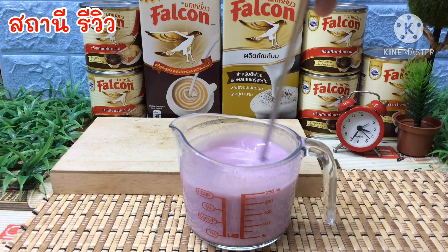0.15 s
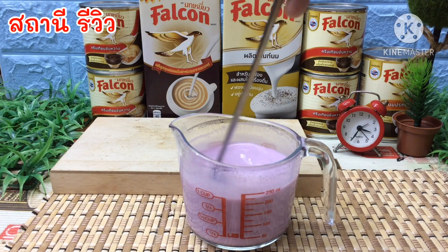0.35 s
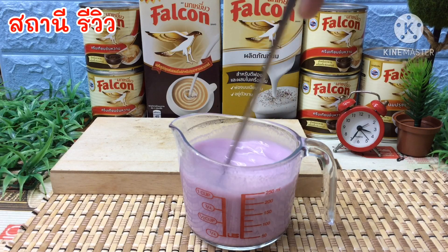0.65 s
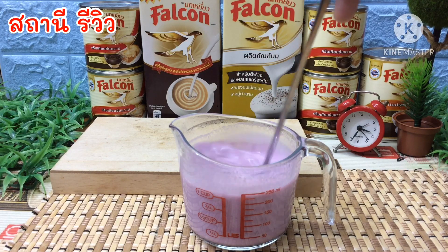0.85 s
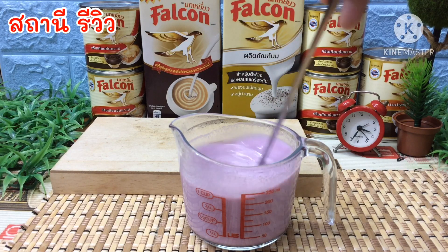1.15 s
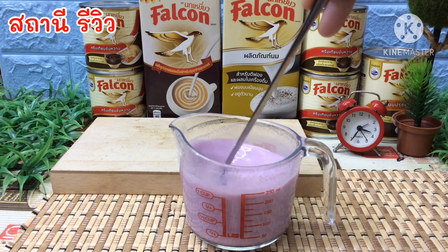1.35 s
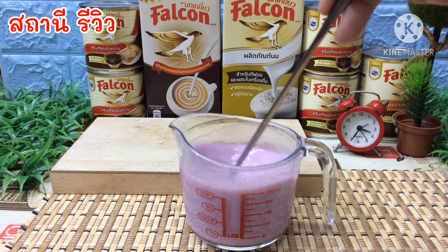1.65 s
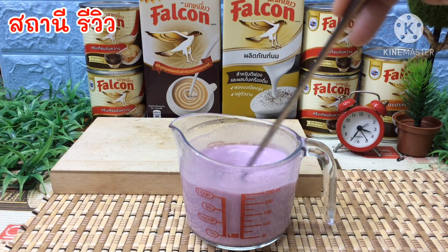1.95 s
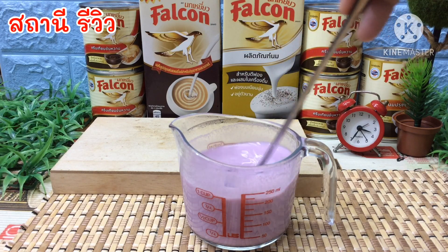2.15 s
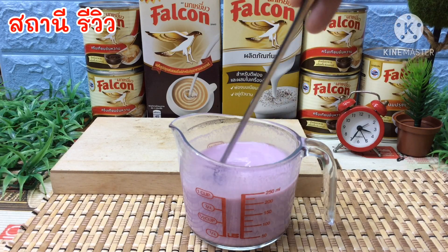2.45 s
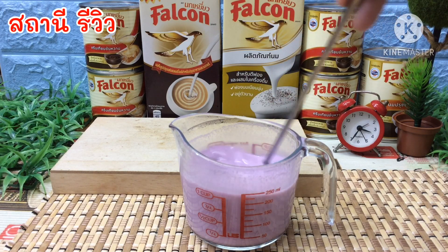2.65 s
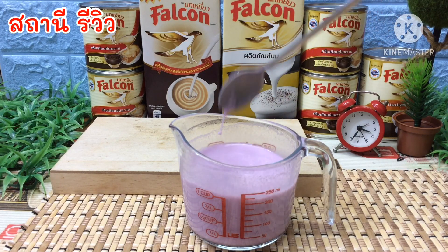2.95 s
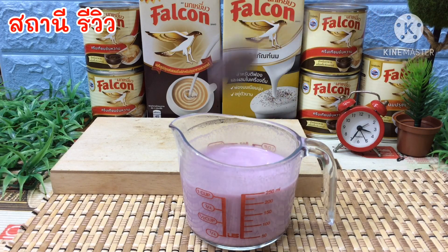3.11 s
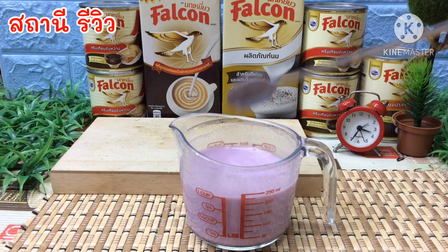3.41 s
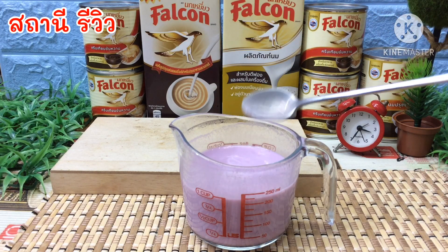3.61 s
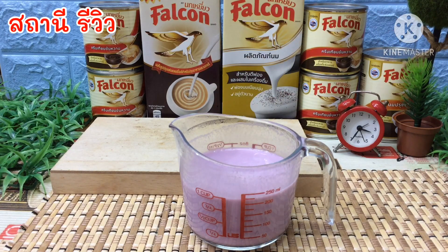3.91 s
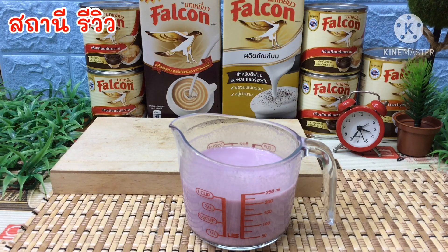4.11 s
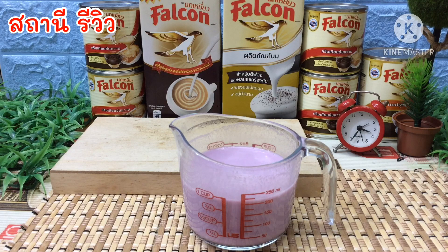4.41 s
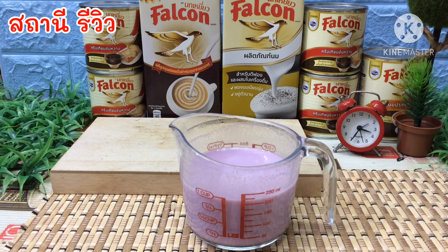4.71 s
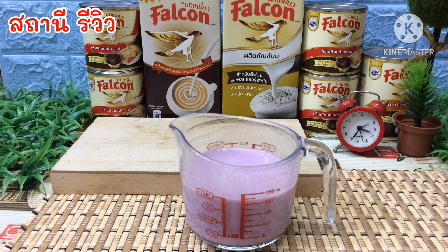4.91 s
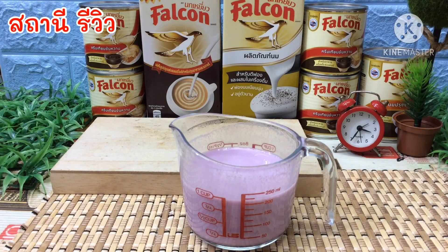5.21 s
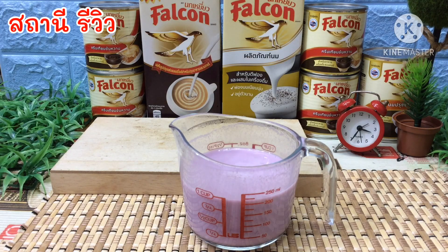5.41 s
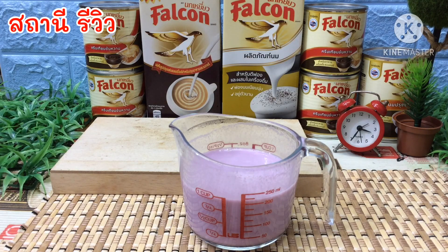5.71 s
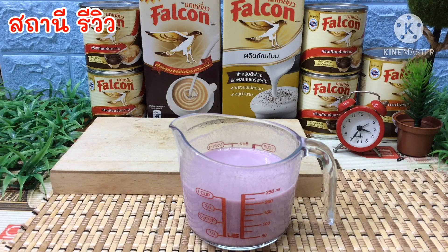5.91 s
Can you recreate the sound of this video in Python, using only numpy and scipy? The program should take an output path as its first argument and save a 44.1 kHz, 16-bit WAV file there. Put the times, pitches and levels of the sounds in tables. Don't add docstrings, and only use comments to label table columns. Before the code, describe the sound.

In a small room, a metal spoon stirs a thick drink in a glass jug, with quick dull-bright clinks and light scraping along the bottom. The stirring softens, then ends with a few more clinks and a small splash. After a quiet gap over low rumble, something lands very loudly on a wooden table, followed by a lighter knock. Close microphone, short reverberation.

```python
import sys
import numpy as np
from scipy import signal
from scipy.fft import rfft, irfft
from scipy.io import wavfile
from scipy.ndimage import uniform_filter1d

SR = 44100
rng = np.random.default_rng(int(sys.argv[2]) if len(sys.argv) > 2 else 0)


def to_linear_factor(level_db):
    exponent = np.asarray(level_db, float) / 20
    return 10 ** exponent


def master_out(mix):
    frames = np.transpose(np.atleast_2d(mix))
    ceiling = np.clip(frames, -1, 1)
    pcm = np.round(ceiling * 32767).astype(np.int16)
    wavfile.write(sys.argv[1], SR, pcm)


N = 267150

# pitch_hz, density_db (per Hz)
HISS_SPECTRUM = [(20, -33.5), (50, -24), (70, -19), (120, -23.5), (170, -30.5), (313, -35.5), (600, -38.5),
                 (1380, -45.5), (4000, -52.5), (15300, -55.5), (16300, -65), (16800, -71)]
HISS_DB, RUMBLE_DB, RUMBLE_SWAY_DB = -54, -41, 2
# pitch_hz, width_hz, level_db
MACHINE_HUM = [(48.5, 4.54, -42.5), (136.4, 8.6, -63)]
# nearest_s, half_length_s, level_db
TRAFFIC = [
    (0.08, .2, -45.5),
    (0.55, 0.25, -51.5),
    (1.7, 1.6, -53),
    (3.35, 0.98, -49),
    (4.2, 0.74, -62),
    (5.05, 0.55, -49),
]
# time_s, upper_mode_hz, lower_mode_hz
SPOON_PATH = [(0.0, 1680, 1260), (0.085, 1466, 925), (0.33, 1310, 1060), (0.39, 1445, 1150),
              (0.7, 1410, 1055), (0.89, 1515, 1040), (0.98, 1700, 1180), (1.04, 1360, 1130),
              (1.18, 1410, 1124), (1.28, 1630, 1126), (1.42, 1410, 1040), (1.55, 1680, 1113),
              (1.78, 1490, 1180), (1.86, 1650, 1110), (1.95, 1660, 1224), (2.1, 1350, 1000),
              (2.22, 1513, 1134), (2.7, 1458, 1016)]
# middle_s, half_length_s, upper_mode_db, lower_mode_db and grit_db (against upper)
STROKES = [(0.0, .04, -40, 2, -11), (0.085, 0.067, -49.5, -8, -11), (0.335, 0.07, -50, 4, -7),
           (0.393, 0.03, -41.5, -24, -17), (0.57, 0.12, -44, 1, -7), (0.655, 0.08, -57.5, 9.5, -8),
           (0.73, 0.079, -54.5, -9, -23), (0.895, 0.065, -41.5, -9, -7), (0.955, 0.047, -47, -14, -21),
           (0.99, 0.038, -48.5, -4, -23), (1.075, 0.028, -54, -3, -12), (1.19, 0.11, -49.5, 4, -9),
           (1.28, .08, -57, 6, -15), (1.4, 0.093, -57.5, -15, -13), (1.54, 0.091, -51.5, -3, -13),
           (1.69, 0.12, -56.5, -7, -16), (1.86, 0.065, -59.5, 5, -7), (1.96, 0.13, -58, -5, -12),
           (2.192, 0.066, -53, -1.5, -28), (2.29, 0.21, -63, 3, -12), (2.649, 0.094, -48, -2.5, -2.5),
           (2.71, 0.083, -43.5, -6, -4.5)]
# start_s, level_db, favoured_wall_hz, upper_glass_db and steel_db (against the blow)
BLOWS = [(0.1253, -24.5, 1310, 7.5, -4), (0.2548, -11.5, 1328, 0, -11.5), (0.4226, -14.5, 1248, 3, -6),
         (0.515, -26, 1274, 0, -16), (0.5931, -25, 1408, 8, -3), (0.784, -18.5, 1290, 9.5, 0.6),
         (0.823, -19, 1260, -3, -30), (0.8426, -25.5, 1345, 4.5, -26), (1.109, -18, 1313, 5, -2),
         (2.442, -16.5, 1314, -3, -27), (2.4844, -22, 1283, -1, -42), (2.5703, -34.5, 1410, -7, -28),
         (2.7212, -32.5, 1360, 8, -4)]
# start_s, level_db, favoured_wall_hz
TOUCHES = [(0.285, -28, 1170), (0.452, -46, 1200), (0.483, -28, 1237), (0.6035, -28.5, 1424),
           (0.856, -24.5, 1210), (1.007, -32.5, 1110), (1.070, -38.5, 1376), (1.286, -40.5, 1110),
           (1.3343, -41, 1056), (1.427, -43, 1426), (1.546, -61, 1110), (1.588, -42.5, 1315),
           (1.8046, -46.5, 1305), (2.2562, -43.5, 1410), (2.3351, -35, 1220)]
TOUCH_UPPER_DB, TOUCH_STEEL_DB, SPOON_UNDER_TICK_DB = -12.5, -25, -3
# pitch_hz, level_db, t60_s
WALL_MODES = [(1019, 7, 0.24), (1110, 5, 0.29), (1246, 15, 0.067), (1253, 6.5, 0.041), (1348, 6, 0.2),
              (1410, 13, 0.085), (1550, 9.5, 0.18), (1680, 8.5, 0.14), (1710, 19, 0.04)]
# pitch_hz, level_db, t60_s
UPPER_MODES = [(2120, -9, 0.045), (2170, 1, 0.053), (2166, 11, 0.099), (2970, -10, 0.044), (2940, 0, 0.037),
               (2860, -7, 0.029), (3047, 6, 0.041), (3680, -9.5, 0.033), (4247, -27, 0.018),
               (4340, -34, 0.02), (4930, 3, 0.03)]
# pitch_hz, level_db, t60_s
SPOON_MODES = [(4950, -27, 0.0254), (5890, -3, 0.017), (5700, -9, 0.026), (7070, -18, 0.043),
               (8400, -11, 0.035)]
# start_s, level_db, pitch_hz
BOARD_THUDS = [
    (0.123, -40, 123),
    (0.253, -31, 115.5),
    (0.422, -42.5, 101),
    (0.781, -62, 121),
    (0.822, -39.5, 128),
    (1.111, -37, 126),
    (2.442, -35.5, 120),
    (2.483, -40, 113),
]
# rim_db, rim_hz, middle_hz, spoon_line_db (against the rim)
BLOW_RINGS = [(-38, 2000, 1600, 0), (-29.5, 1540, 2760, -13), (-31.5, 1736, 2400, -15),
              (-55, 1700, 2250, -23), (-43.5, 1680, 2250, -10), (-29.5, 1725, 3000, 2),
              (-39.5, 880, 2280, -9), (-45, 990, 2200, -21), (-32.5, 1694, 2250, -1.5),
              (-31, 1500, 2300, -12), (-36, 1560, 3200, -5), (-53.5, 1300, 3500, -17),
              (-48, 1900, 3100, -24)]
MIDDLE_UNDER_RIM_DB, SPOON_LINE_HZ = -1, 6940
# start_s, level_db, pitch_hz, t60_s
TICKS = [(1.3718, -49.5, 6940, 0.023), (1.4366, -51, 2460, 0.024), (1.6544, -54, 2940, 0.022),
         (1.6921, -45.5, 3000, 0.017), (2.0245, -50, 4940, 0.02), (4.6084, -42.5, 2560, 0.012),
         (4.609, -48, 7900, 0.01), (1.8612, -50, 10000, 0.01), (2.987, -49.5, 9130, 0.0082),
         (5.4247, -51, 8900, 0.01), (5.4425, -44.5, 8100, 0.0091), (5.717, -44.5, 1740, 0.0052),
         (5.812, -36, 1680, 0.0065), (5.811, -43.5, 590, 0.027),]
# start_s, level_db, pitch_hz, t60_s
SPLASHES = [
    (0.516, -36, 4000, 0.14),
    (1.52, -55, 2400, 0.12),
    (2.4545, -40, 5300, 0.09),
    (2.66, -46, 3700, 0.16),
]
# start_s, level_db, landing_length_s
LANDINGS = [
    (4.713, 2, 0.01),
    (5.475, -10, 0.011),
]
# pitch_hz, level_db, t60_s
TABLE_MODES = [
    [(200, -2.5, 0.064), (354, -2, 0.062), (480, 3, .06), (590, -2.5, 0.03), (824, -6.5, 0.09),
     (1026, 5.5, 0.042), (1253, 0, 0.03), (1630, -5, 0.026), (1700, -2.5, 0.062), (2220, -5.5, 0.038),
     (2780, -6, .03), (3500, -7.5, 0.03)],
    [(330, -15, 0.046), (478, 6.5, 0.041), (1026, 0, 0.055), (1716, 2, 0.049), (1900, -20, 0.033),
     (2460, -9, 0.038), (2700, -3, 0.022), (3540, -20, 0.024), (7000, -35, .07), (7900, -25, .087)],
]
# pitch_hz, level_db
CRACK_SPECTRA = [
    [(60, -39.5), (135, -14), (280, -27.5), (490, -1.5), (850, -13), (1050, -0.5), (1600, -7.5),
     (3300, -9.5), (6000, -27), (16000, -49)],
    [(60, -46), (190, -12), (330, -0.5), (500, 2.5), (900, -9), (1030, -5.5), (2000, -9.5), (2850, -6.5),
     (4300, -23), (7000, -38), (16000, -60)],
]
# start_s, level_db, table_mode_hz
ROCKS = [(4.713, -24.5, 137), (4.713, -18, 1014), (5.475, -38, 199), (5.476, -29.5, 1017), (4.89, -45, 590),
         (5.04, -49.5, 324), (5.13, -51.5, 590), (5.14, -57.5, 1064), (5.2, -60, 970), (5.205, -57, 565),
         (5.23, -58, 340), (5.61, -55, 1036)]
# pitch_hz, t60_s
ROOM_DECAY = [(100, 0.28), (500, 0.2), (1500, 0.16), (4000, 0.17), (12000, 0.15)]


def evened(x):
    return x / np.sqrt(np.mean(x ** 2) + 1e-20)


def peaked(x):
    return x / np.max(abs(x))


def read(points, hz):
    f, value = np.transpose(points)
    return np.interp(np.log(hz + 1), np.log(f + 1), value)


def add(mix, s, sound):
    part = mix[round(s * SR):][:len(sound)]
    part += sound[:len(part)]


def band(x, lo_hz, hi_hz):
    edges = [lo_hz, min(hi_hz, SR / 2.1)]
    return signal.sosfilt(signal.butter(2, edges, "band", fs=SR, output="sos"), x)


def coloured(x, points):
    gain = to_linear_factor(read(points, np.fft.rfftfreq(len(x), 1 / SR)))
    return irfft(rfft(x) * gain, len(x))


def ring(modes, extra_db, t, longest=0.13):
    hz, db, t60 = np.transpose(modes)[:, :, None]
    t60 = np.clip(t60, 0.01, longest)
    decay = to_linear_factor(db + extra_db[:, None] - 60 * t / t60)
    return (decay * np.sin(2 * np.pi * hz * t)).sum(0)


def resonate(x, hz, width_hz):
    turn = np.exp(2j * np.pi * np.cumsum(hz * np.ones(len(x))) / SR)
    r = np.exp(-np.pi * width_hz / SR)
    smooth = signal.lfilter([1], np.convolve([1, -r], [1, -r]), x / turn)
    return evened((turn * smooth).real)


def swells(rows, t, extra_db=0):
    s, half, db = np.transpose(rows)[:3, :, None]
    return np.sqrt((to_linear_factor(db + extra_db - 20 * ((t - s) / half) ** 2) ** 2).sum(0))


def air():
    far = evened(band(band(rng.standard_normal(N), 150, 360), 150, 900))
    far = far * swells(TRAFFIC, np.arange(N) / SR) * to_linear_factor(-11.0)
    rumble = band(band(rng.standard_normal(N), 16, 38), 12, 45)
    rumble = rumble / np.sqrt(uniform_filter1d(rumble ** 2, size=4500))
    sway = evened(band(rng.standard_normal(N), 0.17, 0.91))
    rumble = to_linear_factor(RUMBLE_DB + RUMBLE_SWAY_DB * sway) * rumble
    hum = sum(to_linear_factor(db) * resonate(rng.standard_normal(N), hz, width) for hz, width, db in MACHINE_HUM)
    hiss = to_linear_factor(HISS_DB) * evened(coloured(rng.standard_normal(N), HISS_SPECTRUM))
    return hiss + far + rumble + hum


def slide():
    s, *columns = np.transpose(SPOON_PATH)
    t = np.arange(3 * SR) / SR
    high_hz, low_hz = (np.interp(t, s, c) for c in columns)
    low_db, grit_db = np.transpose(STROKES)[3:, :, None]
    happens = rng.random((3, len(t))) < 700 / SR
    slips = happens * to_linear_factor(2.5 * np.minimum(rng.exponential(1, (3, len(t))), 4))
    slips = slips * rng.choice([-1., 1.], slips.shape) + 0.16 * rng.standard_normal(slips.shape)
    high = 1.08 * resonate(slips[0], high_hz, 100)
    high += 0.5 * resonate(slips[0], high_hz * 0.705, 170) + 0.1 * resonate(slips[0], high_hz * 1.6, 160)
    low = resonate(slips[1], low_hz, 70) + 0.44 * resonate(slips[1], low_hz * 1.094, 240)
    rub = slips[2] + 0.5 * rng.standard_normal(len(t))
    grit = evened(band(rub, 1000, 3650)) + 1.5 * evened(band(rub, 930, 1850))
    grit += 0.87 * resonate(rub, 2230, 300) + 0.36 * resonate(rub, 3300, 400)
    strokes = swells(STROKES, t, -3.2) * high
    strokes += swells(STROKES, t, low_db - 3) * low
    strokes += swells(STROKES, t, grit_db) * evened(grit)
    out = np.zeros(N)
    add(out, 0, strokes)
    return out


def nearness(hz, slope_db):
    return -slope_db * abs(np.log2(np.array(WALL_MODES)[:, :1] / hz))


def clinks():
    out, t = np.zeros(N), np.arange(9000) / SR
    hits = BLOWS + [(*row, TOUCH_UPPER_DB, TOUCH_STEEL_DB) for row in TOUCHES]
    luck, noise = rng.standard_normal((len(hits), 30)), rng.standard_normal((len(hits), len(t)))
    swing_up = 1 - np.exp(-t / 0.0009)
    for (s, db, hz, upper_db, tick_db), chance, hiss in zip(hits, luck, noise):
        crack = hiss * (to_linear_factor(-60 * t / 0.012) + 0.29 * to_linear_factor(-60 * t / 0.095)) * np.minimum(t / 0.00047, 1)
        mix_db = np.maximum(nearness(hz, 47.0)[:, 0], -12.) + 2 * chance[:9]
        wall = peaked(ring(WALL_MODES + [(hz, 10.5, 0.07)], np.append(mix_db, 0), t) * swing_up)
        shifted_t = t * (1 + 0.03 * chance[25])
        upper = peaked(ring(UPPER_MODES, 2 * chance[9:20], shifted_t, longest=0.03))
        upper = peaked(0.3 * upper + peaked(band(crack, 1770, 4330)))
        spoon = peaked(ring(SPOON_MODES, 2 * chance[20:25], t, longest=0.032))
        spoon = peaked(0.5 * spoon + peaked(band(band(crack, 3700, 7530), 3380, 8000)))
        tick = peaked(band(band(crack, 8730, 13000), 7750, 15600))
        steel = to_linear_factor(tick_db + SPOON_UNDER_TICK_DB) * spoon + to_linear_factor(tick_db) * tick
        add(out, s, to_linear_factor(db) * (wall + to_linear_factor(upper_db) * upper + steel))
    for (s, db, hz), hiss in zip(BOARD_THUDS, noise):
        board = np.sin(2 * np.pi * hz * t) + 0.75 * evened(band(hiss, 104, 515))
        board = peaked(board * to_linear_factor(-60 * t / 0.096) * (1 - np.exp(-t / 0.0041)))
        add(out, s, to_linear_factor(db + 0.5) * board)
    return out


def rings():
    out, t = np.zeros(N), np.arange(9000) / SR
    for (s, *_), (db, rim_hz, middle_hz, line_db) in zip(BLOWS, BLOW_RINGS):
        modes = [(rim_hz, 0, 0.055), (middle_hz, MIDDLE_UNDER_RIM_DB, 0.05), (SPOON_LINE_HZ, line_db, 0.038)]
        add(out, s, to_linear_factor(db + 7.5) * ring(modes, np.zeros(3), t) * (1 - np.exp(-t / 0.00027)))
    return out


def ticks():
    out, t = np.zeros(N), np.arange(6000) / SR
    noise = rng.standard_normal((len(TICKS + SPLASHES), len(t)))
    for (s, db, hz, t60), hiss in zip(TICKS + SPLASHES, noise):
        spray = 0.52 * evened(band(hiss, hz / 1.1, hz * 1.3)) * t60 / 0.02
        ping = np.sin(2 * np.pi * hz * t) + spray
        add(out, s, to_linear_factor(db) * peaked(ping * to_linear_factor(-60 * t / max(t60, 0.002))))
    return out


def knocks():
    out, t = np.zeros(N), np.arange(12000) / SR
    for (s, db, length), modes, colour in zip(LANDINGS, TABLE_MODES, CRACK_SPECTRA):
        contacts = np.zeros(1500)
        at = np.minimum(np.append(0, rng.random(5)) * length * SR, 1499).astype(int)
        contacts[at] = rng.uniform(0.6, 1, 6)
        wood = ring(modes, np.zeros(len(modes)), t, longest=0.087)
        wood = signal.fftconvolve(wood, contacts)[:len(t)]
        fading = to_linear_factor(-60 * np.maximum(t - length, 0) / 0.042) * np.minimum(t / 0.00045, 1)
        fading = fading * (1 + 0.59 * np.exp(-t / 0.003))
        crack = evened(coloured(rng.standard_normal(len(t)), colour)) * fading
        landing = band(0.36 * peaked(wood) + 0.72 * peaked(crack), 110, 13000)
        add(out, s + 0.0004, to_linear_factor(db + 1.0) * landing)
    for s, db, hz in ROCKS:
        rock = ring([(hz, 0, 0.07), (hz * 1.07, -5, 0.05)], np.zeros(2), t)
        add(out, s, to_linear_factor(db) * peaked(rock * (1 - np.exp(-t / 0.012))))
    return out


def room(x):
    at = np.arange(200, SR // 2 - 20, 20)
    turn = np.arange(N) / SR * 2 * np.pi * 1.3
    out = 0
    for k in range(3):
        taps = np.zeros(SR // 2)
        taps[at + rng.integers(0, 20, len(at))] = rng.choice([-1., 1.], len(at))
        hz, t, z = signal.stft(taps, SR, nperseg=256)
        fading = to_linear_factor(-60 * t / read(ROOM_DECAY, hz)[:, None])
        fading = fading + to_linear_factor(-32.0 - 60 * t / 0.61)
        tail = signal.istft(z * fading, SR, nperseg=256)[1]
        share = np.sqrt(2 / 3) * np.cos(turn + k * np.pi / 3)
        out = out + signal.fftconvolve(x * share, tail / np.linalg.norm(tail))[:N]
    return out


def scene():
    jug, table = clinks() + rings() + ticks(), knocks()
    jug_in_room = jug + to_linear_factor(-4.5) * room(jug)
    table_in_room = slide() + table + to_linear_factor(-3.5) * room(table)
    return (jug_in_room + table_in_room + air())[None]


def low_pass(x):
    return signal.sosfilt(signal.butter(12, 16750, fs=SR, output="sos"), x)


def record(dry):
    return low_pass(np.clip(dry, -1, 1))


dry = scene()
out = record(dry)
master_out(out)
```